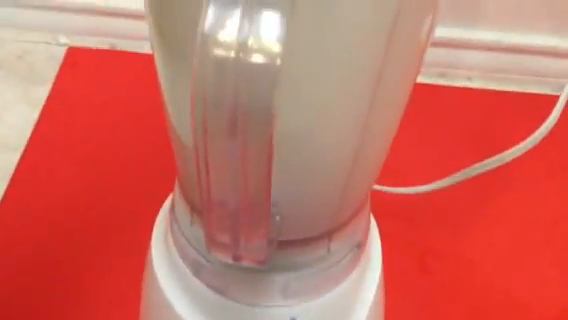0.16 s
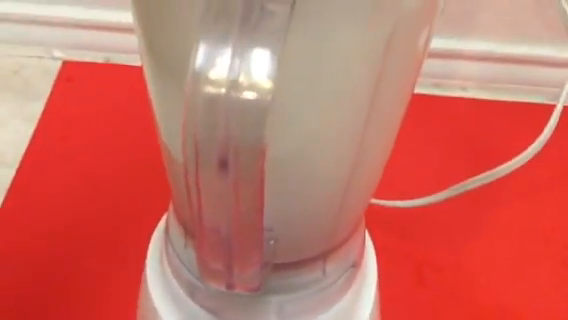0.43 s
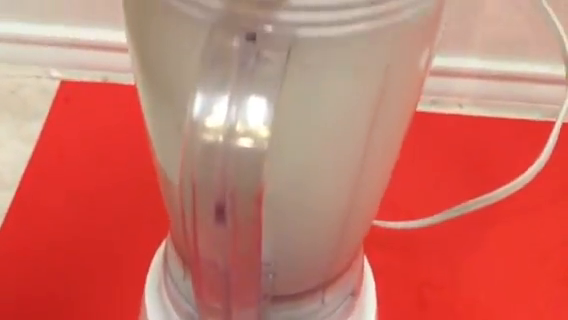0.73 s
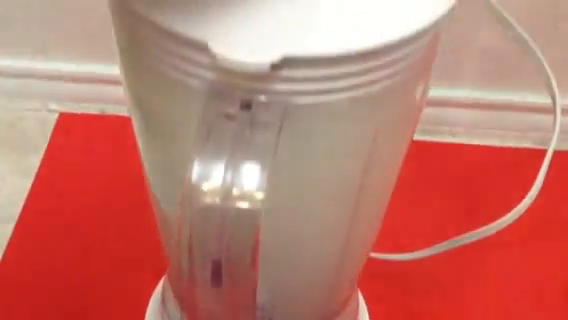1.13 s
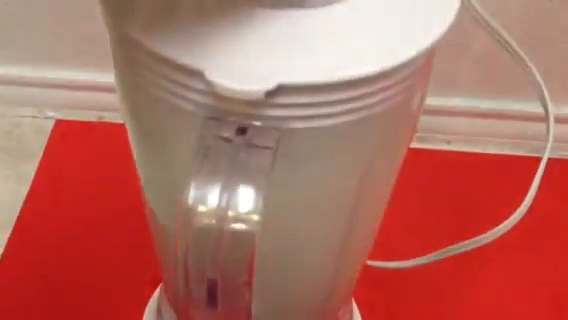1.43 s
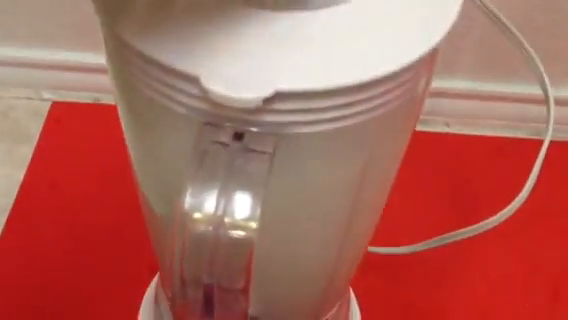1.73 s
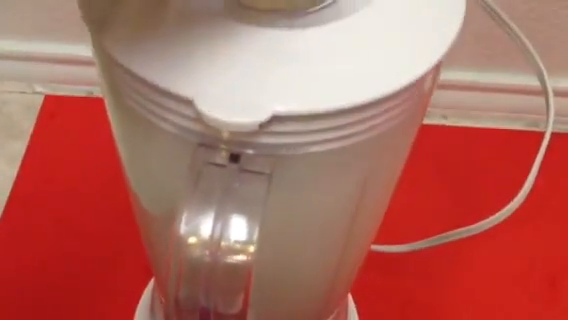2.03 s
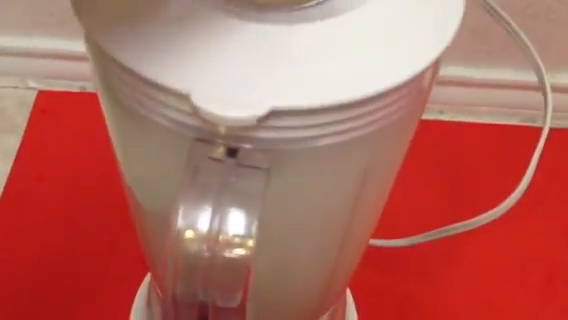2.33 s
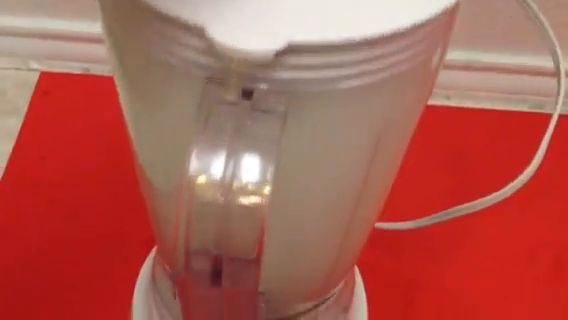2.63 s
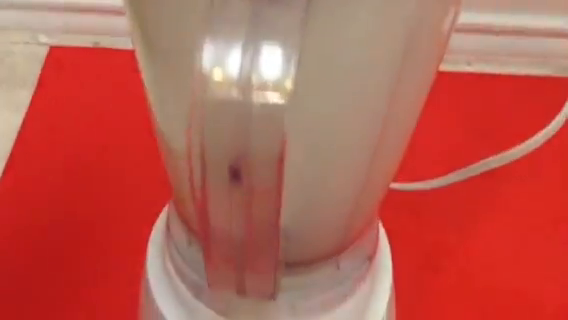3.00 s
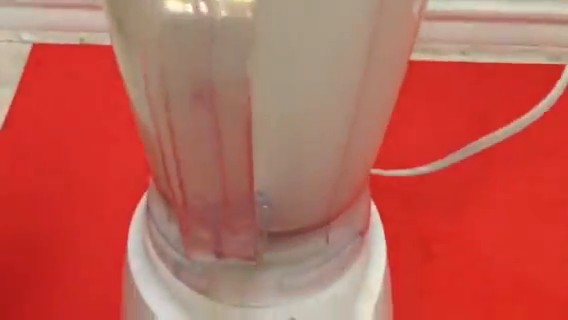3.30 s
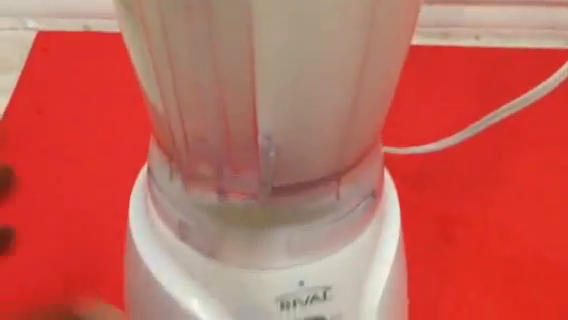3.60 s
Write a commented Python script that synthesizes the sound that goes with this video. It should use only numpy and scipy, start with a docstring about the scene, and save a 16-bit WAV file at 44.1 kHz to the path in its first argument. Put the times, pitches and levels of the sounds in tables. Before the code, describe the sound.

A blender whines and roars close by, churning liquid in a plastic jar.

```python
"""A countertop blender whines and churns liquid in a plastic jar, heard from close by in a kitchen.
The liquid loads the blades about four times a second, so the shaft's harmonics sag and recover in pitch.
Blade strokes and collapsing bubbles force the jar's resonances, and the motor's brushes hiss in time
with the mains. The timbre shifts as the listening point moves between base and lid.
Short reverberation blurs it all, over a faint rumble."""
import sys
import numpy as np
from scipy import signal
from scipy.fft import rfft, irfft
from scipy.io import wavfile
from scipy.ndimage import uniform_filter1d, minimum_filter1d, map_coordinates

SR = 44100
rng = np.random.default_rng(int(sys.argv[2]) if len(sys.argv) > 2 else 0)


def file_out(sig):
    """Save sig as 16-bit WAV at sys.argv[1]."""
    # one column per channel
    cols = np.atleast_2d(sig).T
    # limit, then scale
    lim = np.clip(cols, -1, 1)
    pcm = np.round(lim * 32767).astype(np.int16)
    wavfile.write(sys.argv[1], SR, pcm)


N = 165375
MAINS_HZ = 60
# Path of the listening point. Each row: time in seconds, height from 0 at the base to 1 at the lid.
LISTENING_HEIGHT = [(0, 0), (.6, 0), (1.3, 0.34), (1.8, 0.92), (2.5, 1), (2.9, 0.65), (3.2, 0.23),
                    (3.75, 0.69)]


def shaft_speed():
    """Load torque: the shaft slows as liquid loads the blades and recovers as it frees them."""
    # Turning points of the speed. Each row: time in seconds, turns per second.
    speed_turning_points = [(0.0, 112.9), (0.08, 111.5), (0.23, 115.9), (0.33, 111.7), (0.47, 114.9),
                            (0.58, 111.1), (0.74, 115.7), (0.84, 112.0), (0.98, 115.3), (1.11, 111.8),
                            (1.25, 115.3), (1.34, 111.8), (1.53, 115.5), (1.63, 112.1), (1.82, 117.0),
                            (1.9, 114.0), (2.01, 116.4), (2.14, 112.8), (2.27, 116.0), (2.39, 111.1),
                            (2.51, 116.1), (2.65, 112.0), (2.78, 115.9), (2.9, 112.2), (3.04, 115.9),
                            (3.17, 112.4), (3.35, 115.0), (3.43, 112.4), (3.58, 116.6), (3.69, 111.7),
                            (3.74, 113.0)]
    return eased(speed_turning_points) * (1 + .003 * wander(50))


def shaft_harmonic(order, turns):
    """Amplitude and phase modulation: a shaft harmonic flutters as liquid buffets the blades."""
    flutter_per_s, wobble_rad, flicker_db = 28, .35, 2.5
    phase = 2 * np.pi * (np.round(order) * turns + rng.random()) + wobble_rad * wander(flutter_per_s)
    return unit_rms(np.sin(phase) * undb(flicker_db * wander(flutter_per_s)))


def motor_whine(speed, turns):
    """Periodic forcing: motor and blades sound at multiples of the shaft speed, chiefly the tenth."""
    # Strength of the tenth harmonic. Each row: time in seconds, level in dB.
    main_levels = [(0, -28), (.15, -21), (.65, -22.5), (.8, -22.5), (1.3, -22.5), (1.68, -18), (1.8, -32.5),
                   (2.12, -21.5), (2.35, -34), (2.55, -32), (2.68, -25.5), (3.05, -36), (3.18, -18),
                   (3.45, -27), (3.75, -22)]
    # The other harmonics. Each row: multiple of the shaft speed, level in dB,
    # dB added per turn per second above the mean speed, dB added at lid height.
    harmonics = [(2, -43.5, -1.3, 1.5), (3, -41, 0.9, -2.5), (4, -38.5, -1.5, 2), (5, -44, -2.5, -4.5),
                 (6, -46.5, 3, 2.5), (7, -38.5, 3.5, -10), (8, -40.5, 0.5, 11), (9, -28.5, 0, 0.5),
                 (11, -40.5, -5, 2), (12, -33, 1, 2.5), (13, -37.5, -0.5, 6.5), (14, -33.5, 0, 2),
                 (16, -33.5, 0, 1), (18, -31.5, 3.5, -5.5), (19, -36, -2, 9.5), (20, -34, 1.5, -2)]
    surge, height = speed - speed.mean(), curve(LISTENING_HEIGHT)
    whine = undb(curve(main_levels)) * shaft_harmonic(10, turns)
    for order, db, surge_db, lid_db in harmonics:
        whine += undb(db + surge_db * surge + lid_db * height) * shaft_harmonic(order, turns)
    return whine


def blade_strokes(turns):
    """Turbulence and bubble collapse: a random force, strongest as each of two blades sweeps by."""
    bubbles_per_s, bubble_power_share = 4000, .25
    collapses = (rng.random(N) < bubbles_per_s / SR) * rng.choice([-1, 1], N)
    strength_db = 2 * np.minimum(rng.exponential(size=N), 6)
    bubbles = np.sqrt(bubble_power_share) * unit_rms(collapses * undb(strength_db))
    turbulence = np.sqrt(1 - bubble_power_share) * rng.standard_normal(N)
    blade_passing = 1 + .13 * np.cos(2 * np.pi * 2 * turns)
    return (bubbles + turbulence) * blade_passing


def churning(turns):
    """Broadband flow noise: the blade strokes make the liquid roar."""
    # Strength of the roar. Each row: time in seconds, relative level in dB.
    churn_levels = [(0, -17), (.2, -17), (.32, -17), (.85, -17.5), (1.15, -16), (1.28, -15.5), (1.48, -16),
                    (1.56, -18.5), (1.87, -15.5), (1.93, -19), (2.08, -16.2), (2.25, -17.5), (2.45, -16),
                    (2.72, -15.5), (2.79, -17.5), (3.1, -15.5), (3.45, -17), (3.75, -15.5)]
    # Spectrum of the roar. Each row: frequency in Hz, relative spectral density in dB.
    churn_spectrum = [(30, -58), (95, -41), (140, -28), (195, -23.5), (245, -11), (400, -11.5),
                      (500, -12.5), (680, -9), (780, -1), (1250, -5.5), (1700, -2.5), (2400, -1),
                      (3300, -1.5), (3650, -2), (4900, -5), (5350, -13), (7500, -11.5), (10000, -14),
                      (15000, -19.5)]
    effort = unit_rms(undb(curve(churn_levels) + .44 * wander(50)))
    return undb(-15.5) * colour(blade_strokes(turns), churn_spectrum) * effort


def jar_modes(turns):
    """Forced resonance: blade strokes drive the modes of the jar and the motor housing."""
    # The modes. Each row: frequency in Hz, bandwidth in Hz, level in dB, dB added at lid height.
    modes = [(340.6, 22, -44, 3), (576, 79, -40, -1.5), (968, 54, -27, 3.5), (1032, 106, -23, -1.5),
             (1152, 103, -27.5, 4.5), (1513, 63, -35, 5), (1865, 61, -28.5, 3.5), (2085, 87, -30.5, 1),
             (2233, 107, -32.5, 7), (3110, 530, -23.5, -40), (3966, 115, -26.5, 0), (4570, 126, -25, 0.5)]
    # Drive of the modes near 1, 2 and 4 kHz. Each row: time in seconds, relative level in dB.
    low_drive = [(0, -2.5), (.45, 2), (.8, -.5), (1.25, 1.5), (1.55, -0.5), (2.3, -1), (2.85, -1),
                 (3.2, .5), (3.45, 3.5), (3.75, -2.5)]
    mid_drive = [(0, -7), (.23, 1), (.75, -1), (1.35, 3), (1.56, -0.5), (1.85, 0), (2.35, -3), (2.75, 0),
                 (3.0, 1.5), (3.3, 1.5), (3.75, -3)]
    high_drive = [(0, -2.5), (.2, 6), (.4, 0.5), (.85, 0.5), (1.25, -1), (1.58, -1), (2.1, -1.5),
                  (2.7, 2.5), (2.85, -0.5), (3.25, -0.5), (3.5, -3), (3.75, -4)]
    height = curve(LISTENING_HEIGHT)
    ringing = np.zeros(N)
    for hz, width, db, lid_db in modes:
        drive_levels = low_drive if hz < 1300 else mid_drive if hz < 3500 else high_drive
        drive = undb(curve(drive_levels) + 1.8 * wander(30.17))
        ringing += undb(db + lid_db * height) * resonate(blade_strokes(turns) * drive, hz, width)
    return ringing


def brush_hiss(mains_phase):
    """Sliding contact noise: the brushes hiss and ring the metal, swelling on each mains half cycle."""
    # Strength of the hiss. Each row: time in seconds, relative level in dB.
    hiss_levels = [(0.02, -17), (0.18, -13.5), (0.45, -16.5), (0.46, -12.5), (0.62, -16.5), (1.49, -16.5),
                   (1.53, -18), (1.88, -17.5), (1.91, -21), (2.11, -15), (2.13, -18.5), (2.74, -15.5),
                   (2.76, -18), (3.15, -17), (3.19, -18.5), (3.38, -13), (3.4, -17), (3.73, -15.5)]
    # Spectrum of the hiss. Each row: frequency in Hz, relative spectral density in dB.
    hiss_spectrum = [(2000, -27), (5000, 7), (7800, 0), (8900, 3.5), (9800, -3.5), (10600, 1), (12000, 3),
                     (13300, 6.7), (14000, 3), (14600, -5), (15300, -4)]
    # Metal parts. Each row: frequency in Hz, bandwidth in Hz, level in dB, dB added at lid height.
    metal_modes = [(5810, 85, -39.5, 8), (6780, 115, -32.5, -0.5), (7310, 71, -36, 6),
                   (11490, 130, -37, 3.5), (14600, 400, -57, -2)]
    height = curve(LISTENING_HEIGHT)
    hiss = undb(-22) * colour(rng.standard_normal(N), hiss_spectrum)
    for hz, width, db, lid_db in metal_modes:
        gain = undb(db + lid_db * height + wander(5.4))
        hiss += gain * resonate(rng.standard_normal(N), hz, width)
    swell = undb(curve(hiss_levels) + 1.05 * wander(45))
    sparking = 1 + .1 * np.cos(2 * mains_phase)
    return hiss * unit_rms(swell * sparking)


def mains_hum(mains_phase):
    """Harmonics of the alternating supply: the motor hums faintly."""
    # Partials of the hum. Each row: multiple of the mains frequency, level in dB.
    partials = [(2, -65), (6, -48)]
    return sum(undb(db) * unit_rms(np.sin(order * mains_phase)) for order, db in partials)


def kitchen(direct):
    """Reverberation: reflections from hard walls add a short, exponentially decaying tail."""
    t60_s, first_reflection_s, wet_gain = .32, .004, undb(-11)
    taps = SR // 2
    t = np.arange(taps) / SR
    tail = rng.standard_normal(taps) * np.exp(-np.log(1000) * t / t60_s) * (t > first_reflection_s)
    padded = np.pad(direct, (taps, 0), mode="reflect")  # the room is already sounding at the start
    wet = signal.fftconvolve(padded, tail / np.linalg.norm(tail))[taps:taps + N]
    return (direct + wet_gain * wet) / np.hypot(1, wet_gain)


def rumble():
    """Amplitude-modulated low noise: faint thuds come and go."""
    # Spectrum of the rumble. Each row: frequency in Hz, relative spectral density in dB.
    rumble_spectrum = [(20, 0), (50, -13), (90, -10), (200, -30)]
    uneven_noise = rng.standard_normal(N) * undb(9 * wander(12))
    return undb(-79) * colour(uneven_noise, rumble_spectrum)


def resonate(force, hz, width):
    """Cascaded resonance: two broader resonators give a steep peak about `width` Hz wide, at rms 1."""
    b, a = signal.iirpeak(hz, hz / (width * np.pi / 2), fs=SR)
    return unit_rms(signal.lfilter(b, a, signal.lfilter(b, a, force)))


def colour(x, spectrum):
    """Spectral shaping by (Hz, dB) points joined over log frequency, at rms 1."""
    hz, db = np.array(spectrum).T
    bin_hz = np.fft.rfftfreq(N, 1 / SR)
    gain = undb(np.interp(np.log(bin_hz + 1), np.log(hz), db))
    return unit_rms(irfft(rfft(x) * gain, N))


def wander(rate):
    """Smooth random modulation through `rate` values a second, at rms 1."""
    coarse = np.arange(0, N + 64, 64)
    values = map_coordinates(rng.standard_normal(2048), [coarse / SR * rate], order=3, mode="wrap")
    return unit_rms(np.interp(np.arange(N), coarse, values))


def curve(table):
    """Linear interpolation of (seconds, value) rows."""
    return np.interp(np.arange(N) / SR, *np.array(table).T)


def eased(table):
    """Half-cosine interpolation of (seconds, value) rows, lingering at each one."""
    times, values = np.array(table).T
    rows = np.arange(len(times))
    place = np.interp(np.arange(N) / SR, times, rows)
    return np.interp(np.floor(place) + np.sin(np.pi / 2 * (place % 1)) ** 2, rows, values)


def undb(db):
    """Decibels to amplitude ratio."""
    return 10 ** (np.asarray(db) / 20)


def unit_rms(x):
    """Normalisation to rms 1."""
    return x / np.sqrt(np.mean(x ** 2))


def scene():
    """Superposition: the shaft's and the mains' sounds add in one room, alike in both channels."""
    speed = shaft_speed()
    turns = np.cumsum(speed) / SR
    mains_phase = 2 * np.pi * MAINS_HZ * np.arange(N) / SR
    blender = motor_whine(speed, turns) + churning(turns) + jar_modes(turns)
    blender += brush_hiss(mains_phase) + mains_hum(mains_phase)
    throb = 1 + .022 * np.cos(2 * mains_phase)
    flutter = undb(.62 * wander(80))
    sound = kitchen(blender * throb * flutter) + rumble()
    return np.array([sound, sound])


def record(dry):
    """Band and peak limiting: the highest treble is cut and the gain dips briefly at rare peaks."""
    cutoff_hz, ceiling = 15300, 1.0
    lowpass = signal.ellip(12, .1, 80, cutoff_hz, fs=SR, output="sos")
    sound = signal.sosfilt(lowpass, dry)
    needed_gain = ceiling / np.maximum(np.abs(sound), ceiling)
    gain = uniform_filter1d(minimum_filter1d(needed_gain, size=200), size=150)
    return signal.sosfiltfilt(lowpass, sound * gain)


dry = scene()
out = record(dry)
file_out(out)
```